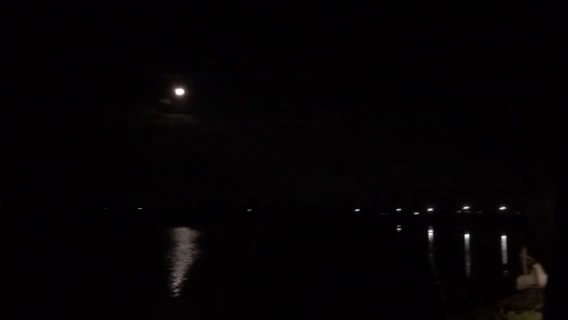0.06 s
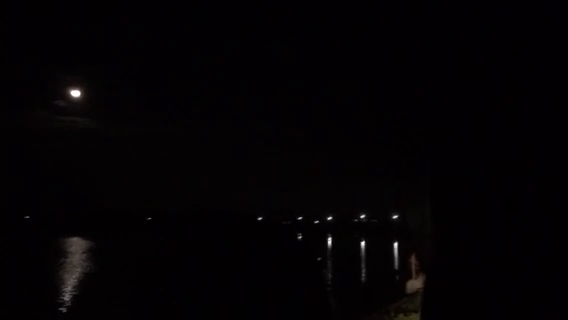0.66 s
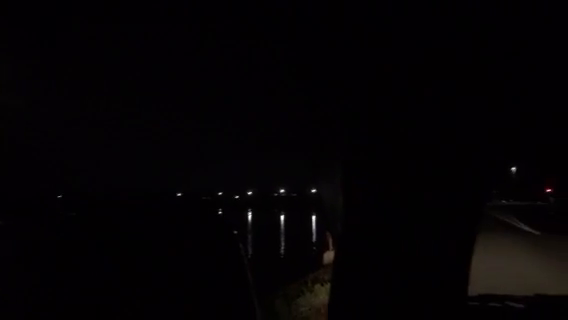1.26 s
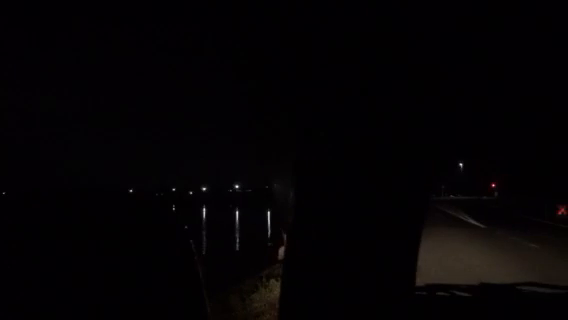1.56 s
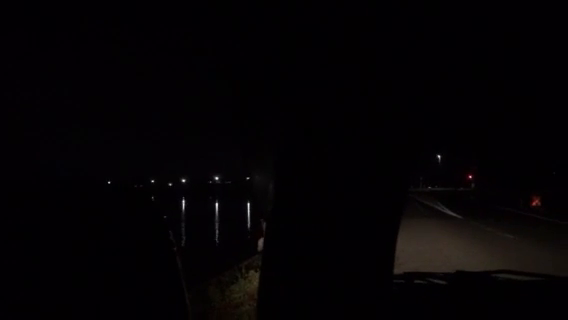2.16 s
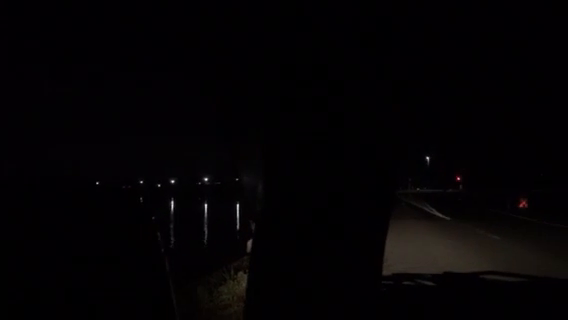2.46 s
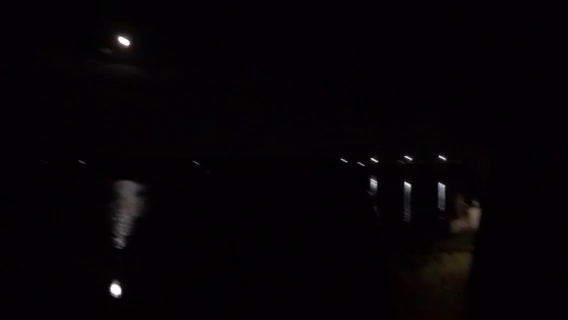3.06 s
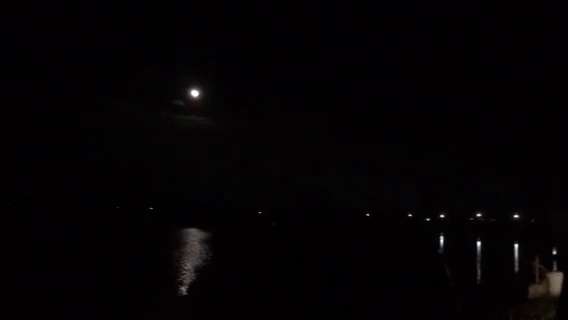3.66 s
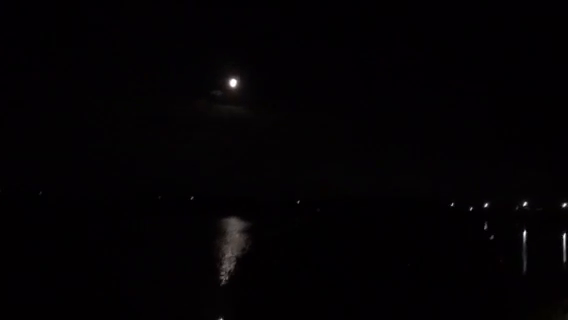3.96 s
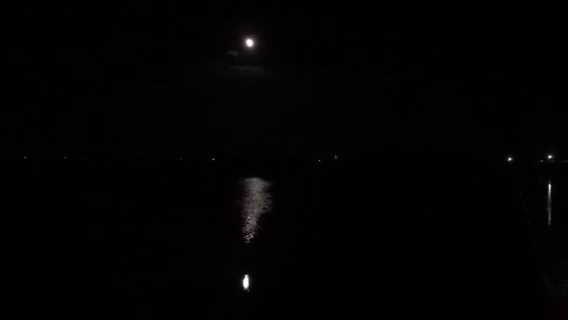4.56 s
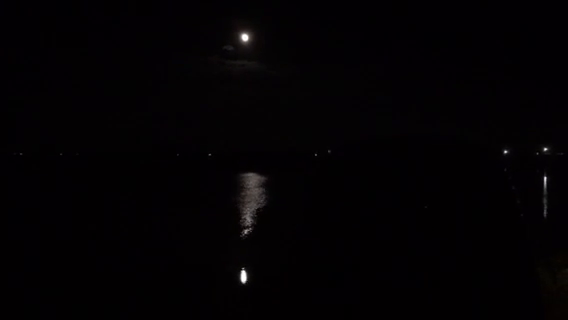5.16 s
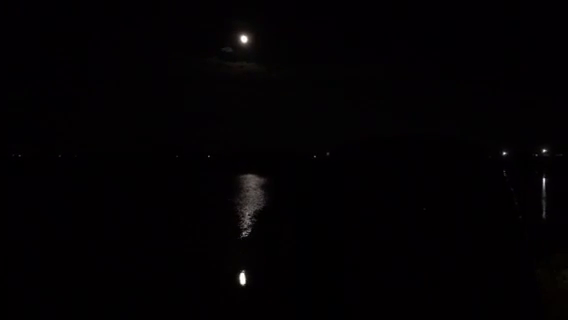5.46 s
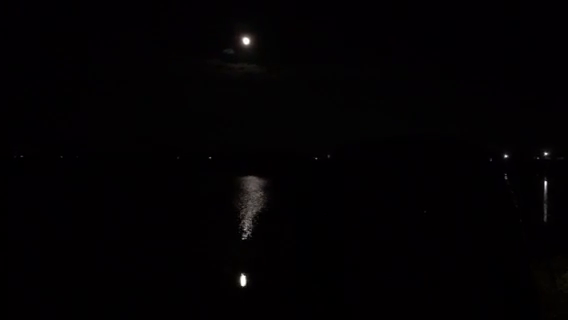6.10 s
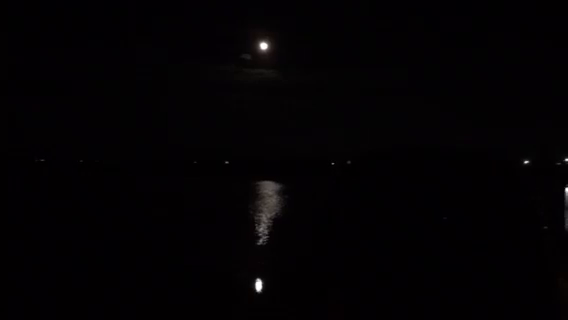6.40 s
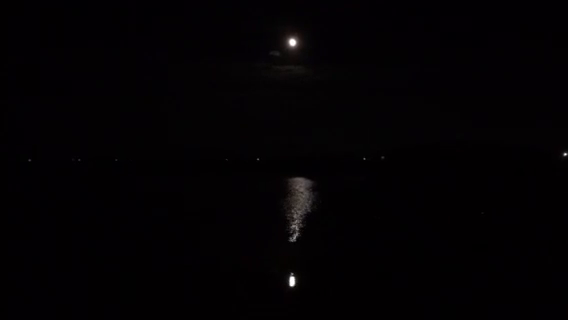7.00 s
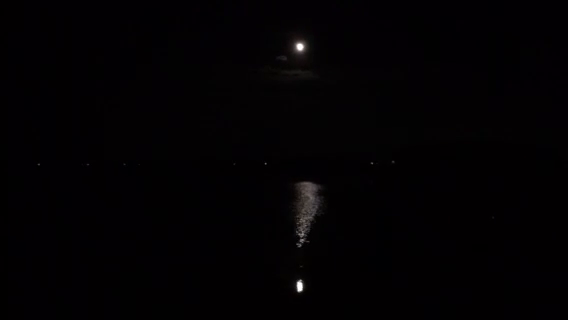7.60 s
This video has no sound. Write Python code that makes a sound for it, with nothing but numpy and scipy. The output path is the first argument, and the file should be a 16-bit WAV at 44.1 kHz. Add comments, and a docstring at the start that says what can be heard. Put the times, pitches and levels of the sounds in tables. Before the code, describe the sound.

Three tree frogs call close by on a lake shore at night, from the start to the end at about 8 seconds. Each call is a short rattle that speeds up, swells and rises slightly, repeating about twice a second. The nearest frog is loudest, a deeper one answers it, and a shriller one keeps its own time. Behind them are a distant chorus and a soft hiss of air. A very faint insect buzz fades by about 3.5 seconds. A parked car idles low underneath, its indicator making a faint tick-tock every 0.7 seconds throughout. Between 3 and 3.5 seconds the frogs brighten slightly as the microphone turns toward the water. At about 3.4 seconds the air conditioning engages with a small snap and a dull thud. The engine slows a little and grows louder, and a steady fan hum rises and stays beneath the frogs.

```python
"""Three tree frogs take turns in quick rattling calls on a lake shore at night.
Each call is a train of pulses ringing the throat and vocal sac; it speeds up, swells and rises in
pitch as the throat tightens. Behind them are a distant chorus, a faint insect and the night air.
A parked car idles with its indicator ticking; the air-conditioning clutch engages, the engine sags
under the load and the cooling fan hums."""
import sys
import numpy as np
from scipy import signal
from scipy.fft import rfft, irfft
from scipy.io import wavfile

SR = 44100
rng = np.random.default_rng(int(sys.argv[2]) if len(sys.argv) > 2 else 0)


def master_out(mix):
    """Clip the mix to full scale and print it as 16-bit PCM to the path in sys.argv[1]."""
    frames = np.transpose(np.atleast_2d(mix))
    ceiling = np.clip(frames, -1, 1)
    pcm = np.round(ceiling * 32767).astype(np.int16)
    wavfile.write(sys.argv[1], SR, pcm)


N = 345744
TIME = np.arange(N) / SR
CLUTCH_S = 3.435  # the air conditioning switches on
FIRST_TICK_S, BLINK_S = .292, .7003  # indicator onset and period

# calls of the nearest frog, which the deep frog answers: t/s, level/dB
NEAR_CALLS = [(-.34, -28), (.105, -27), (.562, -27), (.998, -27), (1.445, -26.5), (1.905, -26),
              (2.345, -27), (2.787, -26), (3.23, -28), (3.655, -29), (4.105, -29), (4.57, -28.5),
              (5.03, -28.5), (5.485, -29.5), (5.92, -29.5), (6.338, -29.5), (6.772, -29), (7.24, -29.5),
              (7.68, -29.5)]


def undb(db):
    """Logarithmic level: 20 dB is a factor of ten in amplitude."""
    return 10 ** (np.asarray(db) / 20)


def level(x, db):
    """Normalisation to a given rms level."""
    return x * undb(db) / np.sqrt(np.mean(x ** 2))


def curves(rows, at=TIME):
    """Linear interpolation of each later column against the first."""
    knots, *columns = np.transpose(rows)
    return [np.interp(at, knots, column) for column in columns]


def add(out, start_s, sound):
    """Superposition: a short sound adds to the rest."""
    i = int(start_s * SR)
    a, b = max(i, 0), min(i + len(sound), len(out))
    if b > a:
        out[a:b] += sound[a - i:b - i]


def drift(rate_hz):
    """Slow random modulation with a spread near 1."""
    knots = rng.standard_normal(1024)
    return np.interp(TIME * rate_hz, np.arange(len(knots)), knots)


def noise(spectrum, db):
    """Spectral shaping of white noise, brought to an rms level."""
    hz, gain_db = np.transpose(spectrum)
    f = np.arange(N // 2 + 1) * SR / N
    gain = undb(np.interp(np.log(f + 1), np.log(hz), gain_db))
    return level(irfft(rfft(rng.standard_normal(N)) * gain, N), db)


def night_air():
    """Broadband noise: a steady hiss, strongest near 2.4 kHz."""
    # spectrum of the air: f/Hz, relative level/dB
    spectrum = [(300, 3.5), (1000, -6.5), (2400, 11), (4200, 2.5), (6000, -7.5), (7400, -9), (8300, -15),
                (10500, -13.5), (12500, -25), (15500, -32.5)]
    return noise(spectrum, db=-58)


def insect(hz=7450, db=-82):
    """Narrow-band noise: a thin insect buzz that flickers and fades out midway."""
    buzz = signal.lfilter(*signal.iirpeak(hz, Q=25, fs=SR), rng.standard_normal(N))
    return level(buzz * undb(3 * drift(9)), db) * np.interp(TIME, [3.3, 3.7], [1, 0])


def settle(lag_s):
    """First-order step response: 0 until the clutch engages, then easing towards 1."""
    return 1 - np.exp(-np.maximum(TIME - CLUTCH_S, 0) / lag_s)


def engine(idle_hz=23.85, loaded_hz=21.53, idle_db=-53, loaded_db=-46):
    """Harmonics of the crank rate over rumble: load slows the crank and strengthens the orders."""
    # engine orders: multiple of the crank rate, relative level/dB
    orders = [(1, -14.5), (3, -2), (4, -9.5), (5, -8), (6, -22), (7, -19), (14, -27)]
    # spectrum of the rumble: f/Hz, relative level/dB
    rumble_spectrum = [(20, -27), (33, -17), (50, -4), (75, 0.5), (120, -4.5), (190, -4.5), (260, -15),
                       (305, -13), (400, -20), (560, -18.5), (770, -26), (930, -21), (1200, -29),
                       (3000, -49)]
    load, sag = settle(lag_s=.12), settle(lag_s=.33)
    crank_hz = idle_hz + (loaded_hz - idle_hz) * sag
    angle = 2 * np.pi * np.cumsum(crank_hz * (1 + .004 * drift(6))) / SR
    drone = sum(undb(db + 1.2 * drift(7)) * np.sin(k * angle + 2 * np.pi * rng.random())
                for k, db in orders)
    # until the crank slows, the exhaust boom surges 0.43 s after each tick
    surge = 1 + .68 * (1 - sag) * np.cos(2 * np.pi * (TIME - FIRST_TICK_S - .43) / BLINK_S)
    boom = undb(-50.5) * surge * np.sin(2 * angle)  # two firings a turn
    tones = undb(idle_db + (loaded_db - idle_db) * load) * drone + boom
    rumble = noise(rumble_spectrum, db=-48.5) * undb(load)  # 1 dB more under load
    return np.sqrt(2) * tones + rumble


def fan(blade_hz=188.2, db=-50):
    """Blade-passing tone and its third harmonic: the cooling fan spins up with the clutch."""
    hz = blade_hz * settle(lag_s=.14) * (1 + .005 * drift(14))
    phase = 2 * np.pi * np.cumsum(hz) / SR
    hum = undb(1.2 * drift(8)) * np.sin(phase) + undb(-14 + 2.5 * drift(10)) * np.sin(3 * phase)
    swell = settle(lag_s=.18) ** 2  # the level grows more slowly than the pitch
    return np.sqrt(2) * undb(db) * swell * hum


def knock(hz, width_hz, t60, db):
    """Transient excitation: a decaying noise burst passes twice through a resonance; db is the peak."""
    t = np.arange(SR // 2) / SR
    burst = rng.standard_normal(len(t)) * np.exp(-np.log(1000) * t / t60) * np.minimum(t / .005, 1)
    band = signal.iirpeak(hz, hz / width_hz, fs=SR)
    ring = signal.lfilter(*band, signal.lfilter(*band, burst))
    return undb(db) * ring / np.abs(ring).max()


def indicator(tock_delay_s=.33):
    """Impact sound of a relay: a tick of three resonances, then a broadband tock."""
    out = np.zeros(N)
    for s in np.arange(FIRST_TICK_S, TIME[-1], BLINK_S):
        tick = knock(6020, 500, .03, -56) + knock(12100, 1100, .03, -62) + knock(750, 600, .03, -50)
        add(out, s, tick)
        add(out, s + tock_delay_s, knock(11000, 10000, t60=.055, db=-55))
    return out


def clutch():
    """Impact excitation: the compressor clutch snaps in with a thud and the car body shudders."""
    snap = knock(11200, 600, t60=.08, db=-55) + knock(11000, 10000, t60=.08, db=-55)
    thud = knock(160, 160, t60=.56, db=-34)
    shudder = knock(49, 16, t60=.56, db=-40)
    out = np.zeros(N)
    add(out, CLUTCH_S, snap)
    add(out, CLUTCH_S + .015, thud + shudder)
    return out


def shore(x, wet_db, t60):
    """Reverberation: bank, trunks and water scatter a dull, exponentially decaying tail."""
    t = np.arange(SR // 2) / SR
    tail = rng.standard_normal(len(t)) * np.exp(-np.log(1000) * t / t60) * (t > .002)
    tail = signal.sosfilt(signal.butter(1, 8000, fs=SR, output="sos"), tail / np.linalg.norm(tail))
    return x + undb(wet_db) * signal.fftconvolve(x, tail)[:N]


def call(voice, length_s, pitch, pace, scatter_db=1.1, jitter=.015, waver=.008):
    """Source and filter: accelerating pulses each ring the throat and vocal sac for a few ms."""
    # course of a call: fraction of its length, pulse rate/Hz at pace 1, relative level/dB
    course = [(0, 44, -7), (.14, 71, -3.5), (.27, 95, -2), (.38, 107, -1), (.6, 116, 0), (.8, 130, 0),
              (.91, 152, -2.5), (1, 160, -13)]
    t = np.arange(int(length_s * SR)) / SR
    rate, effort_db = curves(course, t / length_s)
    cycles = np.cumsum(rate * pace) / SR
    chance = rng.standard_normal((48, 2 + len(voice)))[:int(cycles[-1]) + 1]  # one row a pulse
    starts = np.interp(np.arange(len(chance)), cycles, t)
    age = np.arange(320) / SR
    pulses = 0
    for k, (hz, width_hz, db, rise) in enumerate(voice):
        # each resonance climbs as the throat tightens
        tuned_hz = hz * pitch * (1 + rise * (starts / length_s - .6) + waver * chance[:, 2 + k])
        swell = np.pi * width_hz * age / 2
        envelope = (swell * np.exp(1 - swell)) ** 2
        pulses = pulses + undb(db) * envelope * np.sin(2 * np.pi * tuned_hz[:, None] * age)
    sizes = undb(np.interp(starts, t, effort_db) + scatter_db * chance[:, 0])
    onsets = starts + jitter * chance[:, 1] / rate.mean()
    out = np.zeros(len(t) + len(age))
    for s, size, pulse in zip(onsets, sizes, pulses):
        add(out, s, size * pulse)
    return out


def far_chorus(count=14, period_s=.44, pitch_spread=.033):
    """Incoherent sum of far frogs, each with its own pitch and timing; distance takes their treble."""
    # resonances: f/Hz, width/Hz, level/dB, fractional rise over a call
    voice = [(1592, 432, -3.5, .064), (3250, 665, -3, .075)]
    out = np.zeros(N)
    for k, detune in enumerate(rng.permutation(np.linspace(-1, 1, count))):
        for n, (late, loud, tempo) in enumerate(rng.standard_normal((22, 3))):
            rattle = call(voice, length_s=.18, pitch=1 + pitch_spread * detune, pace=1 + .08 * tempo)
            add(out, (n - 1 + k / count) * period_s + .02 * late, undb(1.5 * loud) * rattle)
    return level(shore(out, wet_db=-6, t60=.56), db=-44)


def frog(voice, calls, length_s, pace):
    """Superposition of one frog's calls, all of one length."""
    out = np.zeros(N)
    for start, db, *pitch in calls:
        add(out, start, undb(db) * call(voice, length_s, pitch[0] if pitch else 1, pace))
    return out


def deep_frog(delay_s=.247, db=-34.5):
    """Antiphony: the deep frog answers a fixed time after each call of the nearest one begins."""
    # throat and sac resonances: f/Hz, width/Hz, level/dB, fractional rise over a call
    voice = [(1607, 370, -4.5, 0.068), (3148, 377, -1, 0.12), (2440, 760, -11, 0.45), (5100, 3300, -14, 0),
             (10500, 3000, -29.5, .063)]
    answers = [(start + delay_s, db) for start, _ in NEAR_CALLS]
    return shore(frog(voice, answers, length_s=.16, pace=1.15), wet_db=-4.5, t60=.049)


def shrill_frog():
    """Higher resonances give a shriller timbre; this frog keeps its own time."""
    # throat and sac resonances: f/Hz, width/Hz, level/dB, fractional rise over a call
    voice = [(1814, 570, 1.5, 0.045), (3583, 470, .5, 0.082), (4097, 310, -16.5, 0.019),
             (5210, 520, -24, 0.062), (6550, 1700, -28, 0), (9800, 2600, -28.5, 0)]
    # calls: t/s, level/dB, pitch factor
    calls = [(.03, -34, 0.99), (.412, -34, 0.99), (.798, -35.5, 1.01), (1.27, -36.5, 1.01),
             (1.738, -36.5, 1.01), (2.23, -36.5, 1.02), (2.703, -37, 1.02), (3.157, -35.5, 1),
             (3.575, -34.5, 0.98), (3.97, -34, 0.97), (4.38, -33.5, 0.97), (4.795, -35.5, 1),
             (5.302, -34.5, 0.987), (5.842, -33.5, .97), (6.28, -34, 0.97), (6.715, -34, .97),
             (7.097, -33, 0.96), (7.513, -35, 0.98)]
    return shore(frog(voice, calls, length_s=.135, pace=.93), wet_db=-5.5, t60=.03)


def near_frog():
    """Direct sound dominates: the nearest frog is the loudest and least reverberant."""
    # throat and sac resonances: f/Hz, width/Hz, level/dB, fractional rise over a call
    voice = [(1688, 412, -2, 0.021), (2770, 660, -16.5, 0.029), (3283, 420, -5, 0.12), (5060, 1560, -21, 0),
             (6500, 1770, -24.5, 0.047), (10270, 2500, -30.5, 0.068), (13500, 3000, -36, 0)]
    return shore(frog(voice, NEAR_CALLS, length_s=.18, pace=.99), wet_db=-8, t60=.11)


def facing(x, corner_hz=2500):
    """Directivity: the close frogs brighten as the microphone turns towards the water."""
    # gain of the treble shelf: t/s, level/dB
    treble = [(0, -3), (2.9, -4), (3.5, 0.5), (5, 0.5), (7.84, 0.5)]
    bass = signal.sosfiltfilt(signal.butter(2, corner_hz, fs=SR, output="sos"), x)
    return bass + undb(curves(treble)[0]) * (x - bass)


def scene():
    """Superposition of frogs, car, insect and air in one channel."""
    frogs = facing(near_frog() + shrill_frog() + deep_frog()) + far_chorus()
    car = engine() + fan() + indicator() + clutch()
    return (frogs + car + insect() + night_air())[None]


def record(dry):
    """Band limiting: a steep low-pass cuts the treble above 15.35 kHz."""
    return signal.sosfilt(signal.ellip(10, .2, 70, 15350, fs=SR, output="sos"), dry)


dry = scene()
out = record(dry)
master_out(out)
```